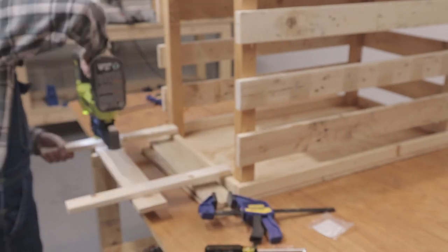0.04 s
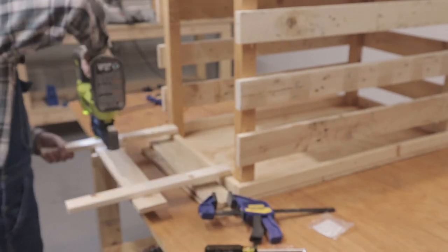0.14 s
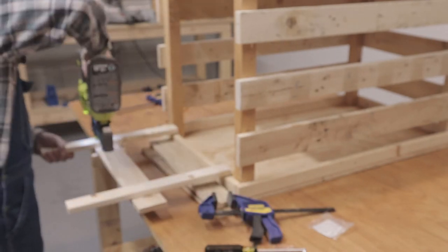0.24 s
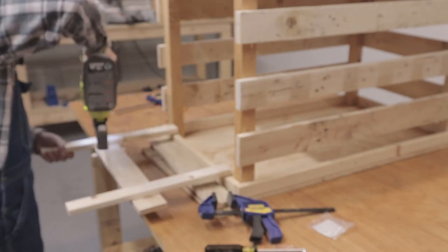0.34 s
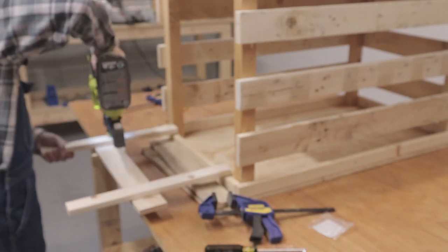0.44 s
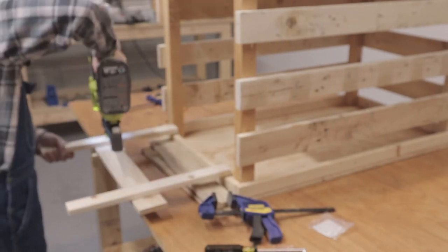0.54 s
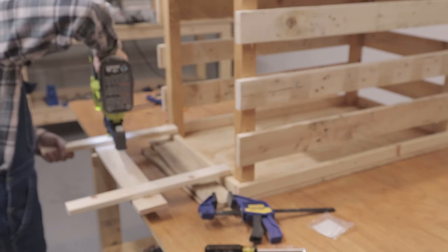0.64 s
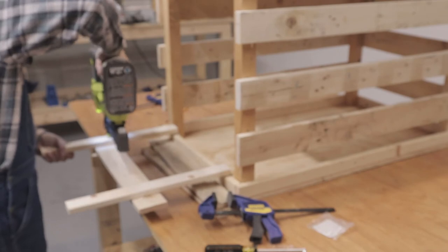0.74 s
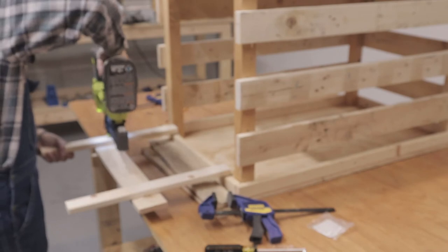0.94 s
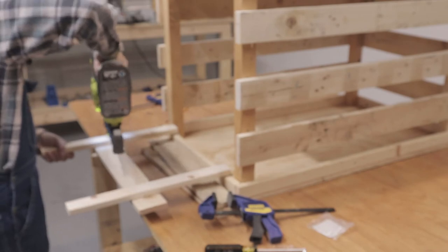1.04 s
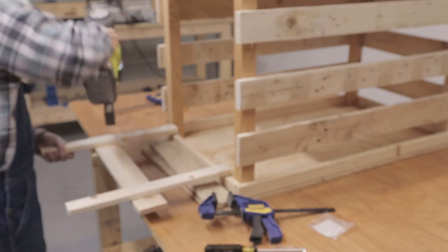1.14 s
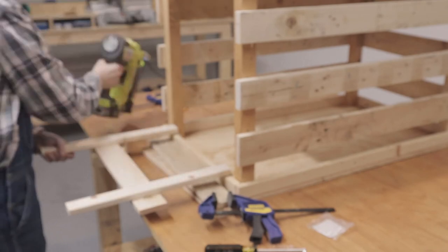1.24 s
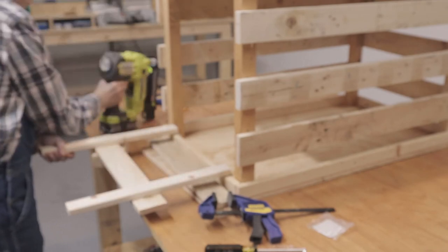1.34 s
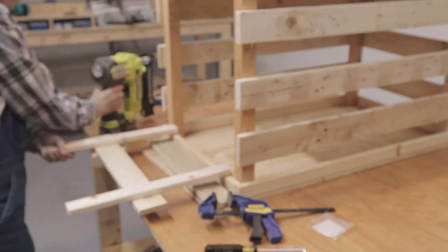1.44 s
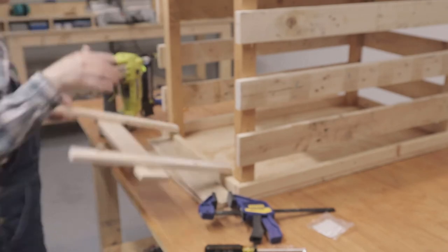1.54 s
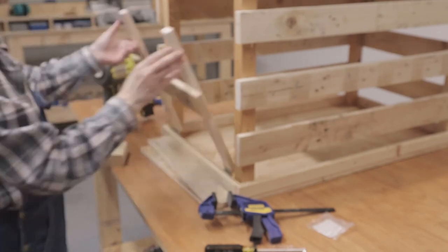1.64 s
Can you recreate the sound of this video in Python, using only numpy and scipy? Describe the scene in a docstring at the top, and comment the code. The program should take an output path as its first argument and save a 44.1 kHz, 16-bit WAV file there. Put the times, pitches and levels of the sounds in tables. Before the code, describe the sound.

A cordless nailer whirs and fires twice into thin wooden slats, each blow followed by a quick reset clack; light taps come between, then two hard wooden knocks, close up in a quiet workshop.

```python
"""A cordless nailer fires twice into wooden slats on a workbench, over a small workshop's faint hum.
Its motor is rising gear tones and noise; each blow and reset is a burst of noise plus a short push of air.
Before, between and after the shots slats tap, as noise thuds and ringing wood tones; knocks add a crack.
Small clicks, a metal clink and the rub of something sliding complete the work on the bench.
"""
import sys
import numpy as np
from scipy import signal
from scipy.fft import rfft, irfft, next_fast_len
from scipy.io import wavfile
from scipy.ndimage import uniform_filter1d, map_coordinates

SR = 44100
rng = np.random.default_rng(int(sys.argv[2]) if len(sys.argv) > 2 else 0)


def unload_audio(sound):
    """Save the sound as a 16-bit wav file, at the path given as the first command line argument."""
    columns = np.transpose(np.atleast_2d(sound))
    # keep every value between -1 and 1, then stretch to whole-number steps
    steps = np.round(np.clip(columns, -1, 1) * 32767)
    wavfile.write(sys.argv[1], SR, steps.astype(np.int16))


N = 72765  # length in samples


def amp(db):
    """Turn decibels into a plain multiplier."""
    return 10 ** (np.asarray(db) / 20)


def unit(x):
    """Scale a sound to an average (rms) strength of 1."""
    return x / np.sqrt(np.mean(x ** 2) + 1e-20)


def since(s):
    """Give the seconds passed since time s, for every sample."""
    return np.arange(N) / SR - s


def along(points, hz):
    """Read a value between (f/Hz, value) points, with pitch on a log scale."""
    f, v = np.transpose(points)
    return np.interp(np.log(hz + 1), np.log(f + 1), v)


def filtered(x, response):
    """Make each frequency of x louder or softer, as the response function says."""
    m = next_fast_len(N + 8192)  # spare room, so that the end does not wrap into the start
    return irfft(rfft(x, m) * response(np.fft.rfftfreq(m, 1 / SR)), m)[:N]


def noise(colour, tilt_db=0):
    """Hiss of rms 1 shaped by a colour table; the tilt, in dB per octave, acts mostly on the treble."""
    def response(hz):
        return amp(along(colour, hz) + tilt_db * np.log2(1 + hz / 1000))
    return unit(filtered(rng.standard_normal(N), response))


def narrow(centre_hz, width_hz):
    """A fuzzy tone of rms 1: noise squeezed into a narrow band."""
    def response(hz):
        return 1 / (1 + ((hz - centre_hz) / width_hz) ** 4)
    return unit(filtered(rng.standard_normal(N), response))


def wobble(rate):
    """A smooth random curve through `rate` random points a second."""
    return map_coordinates(rng.standard_normal(4096), [np.arange(N) * rate / SR], mode="wrap")


def fade(t, t60):
    """Full until t = 0, then dying away by 60 dB in t60 seconds."""
    return amp(-60 * np.maximum(t, 0) / t60)


def rise(t, rise_s):
    """Silent until t = 0, then opening, fast at first."""
    return 1 - np.exp(-np.maximum(t, 0) / rise_s)


def strike(t, t60, rise_s=.00005):
    """The loudness of a hit: a quick rise and a steady dying away."""
    return rise(t, rise_s) * fade(t, t60)


def push(t, width_s):
    """One short smooth shove of air, strongest two widths after t = 0."""
    return np.exp(-.5 * (t / width_s - 2) ** 2)


def mode(t, hz, t60):
    """One resonance, building up and ringing out."""
    return strike(t, t60, rise_s=.0015) * np.sin(2 * np.pi * hz * t)


# colour of the room air: (f/Hz, relative level/dB per Hz)
AIR = [(30, -17), (60, -15.5), (125, -5.5), (180, -10.5), (300, -1), (450, -0.5), (650, -9.5), (1000, -8.5),
       (2000, -14), (3000, -15.5), (5700, -30.5), (7900, -19.5), (9400, -28.5), (15500, -25)]
# hum tones: (f/Hz, rms level/dB)
HUM = [(241, -79.5), (959, -77.5)]


def workshop():
    """Room air is soft noise; the hum is two tones whose phase wavers a little."""
    hum = np.zeros(N)
    for hz, db in HUM:
        phase = 2 * np.pi * hz * since(0) + 0.14 * wobble(14)
        hum += amp(db) * np.sqrt(2) * np.sin(phase)
    return amp(-71.5) * noise(AIR) + hum


# ringing tones of the touched metal part: (f/Hz, level/dB)
CLINK = [(1340, -51.5), (4700, -53)]


def clink():
    """A small metal part is touched: two thin metal modes ring briefly."""
    t = since(1.6335)
    tones = sum(amp(db) * np.sin(2 * np.pi * hz * t) for hz, db in CLINK)
    return strike(t, t60=0.084) * tones


# dry clicks of the tool in the hand: (t/s, level/dB)
CLICKS = [(0.055, -53), (0.7752, -39.5), (1.2291, -57), (1.297, -47.5)]
# colour of a click: (f/Hz, relative level/dB per Hz)
CLICK = [(300, -25), (1500, -10), (3500, -1), (6000, 0), (15000, -3)]


def clicks():
    """The tool clicks in the hand: short bright bursts of noise with no ring."""
    return sum(amp(db) * strike(since(s), t60=0.028, rise_s=.00032) * noise(CLICK) for s, db in CLICKS)


# colour of a thud before any tilt: (f/Hz, relative level/dB per Hz)
THUD = [(150, -34), (300, -11), (650, -6), (950, -6), (1400, -3), (1800, -3), (3000, -7), (5500, -6.5),
        (8000, -11.5), (12000, -18), (15500, -25)]
# how long a thud takes to die away by 60 dB: (f/Hz, t60/s)
THUD_T60 = [(200, 0.25), (1000, 0.099), (3000, 0.064), (12000, 0.063)]


def thud(t, tilt_db):
    """The dense short ring of wood: noise in overlapping bands, the treble dying first."""
    x = noise(THUD, tilt_db)
    edges = [hz for hz, _ in THUD_T60]
    out = np.zeros(N)
    for share, (_, t60) in zip(np.eye(len(edges)), THUD_T60):
        points = list(zip(edges, share))  # 1 at this band's frequency, 0 at the others
        band = filtered(x, lambda hz: along(points, hz))
        out += band * strike(t, t60, rise_s=.0004)
    return out


# ringing tones of bench and slats: (f/Hz, level/dB before contact weight and scatter, t60/s)
WOOD = [(250, -18, .1), (340, -12.5, .075), (420, -7, .072), (484, -3, .088), (652, -3, .088),
        (697, -7.5, .06), (810, -15, .07), (968, -10.5, .075), (1070, -12, .055), (1270, -6, .062),
        (1390, -7, .06), (1495, -8.5, .055), (2030, -10, .06), (2503, -10, .05)]


def ring(t, weight_db):
    """The separate low modes of the wood, each weighted by the contact and scattered a little."""
    out = np.zeros(N)
    for hz, db, t60 in WOOD:
        scatter_db = 1 * rng.standard_normal()
        out += amp(db + weight_db(hz) + scatter_db) * mode(t, hz, t60)
    return out


# loudness of the sliding, before a small wobble: (t/s, level/dB)
SLIDE = [(0, -62), (.1, -70.5), (.22, -69), (0.499, -78), (0.689, -67), (.84, -70), (0.93, -70),
         (1.2, -76.5), (1.44, -64), (1.48, -63), (1.511, -51), (1.526, -56.5), (1.58, -61), (1.65, -65.5)]
# colour of the sliding: (f/Hz, relative level/dB per Hz)
RUB = [(150, -10.5), (400, -8.5), (650, -2), (1300, -5), (2500, -8.5), (5000, -7.5), (9000, -12),
       (15500, -11.5)]
# light taps of shifting slats: (t/s, level/dB, treble tilt/dB per octave)
TAPS = [(0.0118, -51, -0.5), (0.0163, -48.5, -3), (0.0529, -46, -3.5), (0.732, -57, -6.5),
        (0.7393, -51.5, -2), (0.7639, -51.5, -0.5), (1.593, -50.5, -1), (1.6314, -52, 5)]


def handling():
    """Rubbing over the bench is unsteady noise; light taps of slats are thuds with ringing wood."""
    slide_s, slide_db = np.transpose(SLIDE)
    rub_db = np.interp(since(0), slide_s, slide_db) + 0.5 * wobble(150)
    out = amp(rub_db) * noise(RUB)
    for s, db, tilt_db in TAPS:
        t = since(s)
        ring_db = -8.5 - tilt_db  # duller taps ring more
        out += amp(db) * (thud(t, tilt_db) + ring(t, lambda hz: ring_db))
    return out


# knocks on the bench: (t/s, level/dB, treble tilt/dB per octave, crack level/dB, ring level/dB,
#                       ring tilt/dB per octave, favoured f/Hz, its lift/dB);
# crack and ring levels come on top of the knock's level
KNOCKS = [(0.7791, -34, -2.5, -4, -4, -1.7, 484, 5), (1.3171, -19.5, -.5, 4, 0, 1.7, 680, 3),
          (1.3798, -21.5, -1, 6, 0, -2, 1280, 9.5), (1.4457, -38.5, -5.5, -6, -2.5, 3.5, 1124, 14.5)]
# colour of the crack: (f/Hz, relative level/dB per Hz)
CRACK = [(200, 9), (1500, -23), (6000, 20), (15000, -6.5)]
FAVOUR_OCTAVES = 0.25  # width of the favoured group of modes


def knocks():
    """Each contact cracks, thuds and rings the wood; the point of contact favours some modes."""
    out = np.zeros(N)
    for s, db, tilt_db, crack_db, ring_db, ring_tilt_db, main_hz, main_db in KNOCKS:
        t = since(s)

        def weight_db(hz):
            closeness = np.exp(-(np.log2(hz / main_hz) / FAVOUR_OCTAVES) ** 2)
            return ring_db + ring_tilt_db * np.log2(hz / 1000) + main_db * closeness

        snap = amp(-4) * push(t, width_s=.00004)  # the first instant of a hard contact
        crack = amp(crack_db) * (strike(t, t60=.003) * noise(CRACK) + snap)
        out += amp(db) * (thud(t, tilt_db) + ring(t, weight_db) + crack)
    return out


def bass_cut(x):
    """The bench sounds carry little bass: a filter takes away the lows."""
    return signal.sosfilt(signal.butter(3, 177, "high", fs=SR, output="sos"), x)  # limit in Hz


# the motor's start and its fade once the cycle or reset run ends
START_S, SPIN_UP_S, MOTOR_STOP_T60 = 0.06, 0.0046, .021  # START_S is counted back from the blow

# pitch of the gear whine in one motor cycle: (t/s from the blow, f/Hz before smoothing and jitter)
CYCLE = [(-.056, 5400), (-.049, 7700), (-.042, 10800), (-.035, 12100), (-.027, 12650), (-.019, 11800),
         (-.013, 10200), (-.008, 8300), (-.003, 6700), (.003, 5800), (.018, 9500), (.03, 12750),
         (.043, 11800)]
# gear tones: (multiple of the whine's f, level/dB at top speed, gain/dB per octave of speed,
#              share of the load swell 0-1)
GEARS = [(.5, -9, 8, .5), (.9, -5, 6, .8), (1, -1, 0, 1), (1.205, -6.5, 16, .35)]
# swell of the whine under load: (t/s from the blow, level/dB)
WHINE_LEVEL = [(-.05, -9), (-.028, -8), (-.017, -2), (-.0125, -4), (-.008, 5), (-.003, -4), (.005, -24)]
TOP_SPEED_HZ, WHINE_JITTER = 12800, .018  # whine at top speed; random share of the pitch


def whine(t):
    """Gear tones climb as the motor spins up, then sag and swell as it compresses the air spring."""
    s, hz = np.transpose(CYCLE)
    pitch = uniform_filter1d(np.interp(t, s, hz), size=200)
    octaves = np.log2(pitch / TOP_SPEED_HZ)
    load_db = np.interp(t, *np.transpose(WHINE_LEVEL))
    running = rise(t + START_S, SPIN_UP_S) * fade(t - s[-1], MOTOR_STOP_T60)
    tones = np.zeros(N)
    for multiple, db, grow_db, share in GEARS:
        turns = np.cumsum(pitch * (1 + WHINE_JITTER * wobble(900))) / SR
        level = amp(db + grow_db * octaves + share * load_db)
        tones += level * np.sin(2 * np.pi * multiple * turns)
    return running * tones


# colour of the motor's whir: (f/Hz, relative level/dB per Hz)
WHIR = [(100, -36.5), (450, -30), (780, -14), (950, -23.5), (1400, -14), (1900, -5.5), (2600, -11.5),
        (3500, -7.5), (5000, 1), (8000, -4), (11000, -4), (13000, -2), (15500, -1.5)]
# colour of the switch tick: (f/Hz, relative level/dB per Hz)
TICK = [(200, -35.5), (2500, -28), (8000, -10.5), (12000, -4), (14500, 3.5), (16000, -10.5)]
LOAD_S, LOAD_DB_PER_S, UNLOAD_S = .012, 149, 0.064  # peak ahead of the blow, climb to it, t60 after it


def motor(t):
    """A switch tick and a squeak of the drive, then whir noise growing under load with the gear whine."""
    tick = amp(-8.5) * strike(t + .0632, t60=.012, rise_s=.00032) * noise(TICK)
    squeak = amp(3) * mode(t + .0545, hz=11000, t60=.018)
    climb = amp(LOAD_DB_PER_S * np.minimum(t + LOAD_S, 0))
    load = rise(t + START_S, SPIN_UP_S) * climb * fade(t + LOAD_S, UNLOAD_S)
    whir = load * amp(-1.7 + 2.5 * wobble(700)) * noise(WHIR)  # the wobble roughens it
    return whir + whine(t) + tick + squeak


# colour of the blow: (f/Hz, relative level/dB per Hz)
BLOW = [(40, -32.5), (950, -19), (1500, 3.5), (2100, 1.5), (2600, 6), (3300, -4), (4700, 6), (7000, -1),
        (15500, 2.5)]


def blow(t, db):
    """The nail goes in: a noise burst, one ringing tone of the slat and the piston's low shove."""
    nail = amp(db - 10) * mode(t, hz=703, t60=0.06)
    burst = amp(db + 5) * strike(t, t60=.027, rise_s=.0004) * noise(BLOW)
    return nail + burst + amp(-29) * push(t, width_s=.00024)


# colour of the reset run: (f/Hz, relative level/dB per Hz)
RESET = [(100, -19.5), (350, -8), (490, 6), (670, 10), (790, 4), (1000, -0.5), (1230, 6.5), (1500, -1.5),
         (3300, -1.5), (4900, 8), (6500, -1.5), (12000, -6.5), (15500, -1.5)]
# colour of the clack that ends it: (f/Hz, relative level/dB per Hz)
CLACK = [(40, -32.5), (900, -12.5), (1600, 1.5), (2500, -15), (4000, -3.5), (6500, 4), (11000, 5),
         (15500, -0.5)]
# colour of the coasting motor: (f/Hz, relative level/dB per Hz)
COAST = [(100, -36), (280, -16), (480, -2), (1100, -4), (1700, 5), (2200, -11.5), (3500, -6), (5500, -1.5),
         (6900, 4), (10000, -4.5), (13000, 1), (16000, -10)]


def reset(t, run_db, delay_s, clack_db):
    """After the blow, run noise swells up to a clack with a shove of air; then the motor coasts down."""
    after = t - delay_s
    swell = amp(run_db + 95.5 * np.minimum(after, 0))  # climbs 95.5 dB a second
    run = swell * rise(t, SPIN_UP_S) * fade(after, MOTOR_STOP_T60) * noise(RESET)
    clack = amp(clack_db + 3.5) * strike(after, t60=.021, rise_s=.00065) * noise(CLACK)
    shove = amp(-34) * push(after, width_s=.00024)
    coast = amp(-34) * rise(after, SPIN_UP_S) * fade(after - 0.031, t60=0.078) * noise(COAST)
    return run + clack + shove + coast


# steel of the nailer ringing on: (f/Hz, half width/Hz, level/dB at the blow)
SPRING = [(7610, 40, -71.5), (7835, 25, -68.5), (7950, 110, -70), (5180, 60, -83)]


def spring(t):
    """A spring rings on after the blow as fuzzy high tones."""
    tones = sum(amp(db) * narrow(hz, width_hz) for hz, width_hz, db in SPRING)
    return strike(t, t60=1.25) * tones


# shots: (t/s of the blow, motor level/dB, blow level/dB, reset run level/dB, reset delay/s, clack level/dB);
# these set the balance, and each function adds its own offset to them
SHOTS = [(0.2994, -19.5, -16, -28, .0447, -14), (1.0092, -19.5, -16.5, -28.5, .0433, -14)]


def nailer():
    """For each shot the motor spins up, the blow drives the nail, the drive resets and a spring rings on."""
    out = np.zeros(N)
    for s, motor_db, blow_db, reset_db, reset_s, clack_db in SHOTS:
        t = since(s)
        out += amp(motor_db) * motor(t)
        out += blow(t, blow_db)
        out += reset(t, reset_db, reset_s, clack_db)
        out += spring(t)
    return out


def scene():
    """Add up the nailer, the work on the bench and the workshop's air."""
    shots = nailer()
    bench = bass_cut(knocks() + handling() + clicks() + clink())
    return (shots + bench + workshop())[None]


def record(dry):
    """Cut the treble very steeply above 16000 Hz."""
    return filtered(dry[0], lambda hz: 1 / np.sqrt(1 + (hz / 16000) ** 260))[None]


dry = scene()
out = record(dry)
unload_audio(out)
```